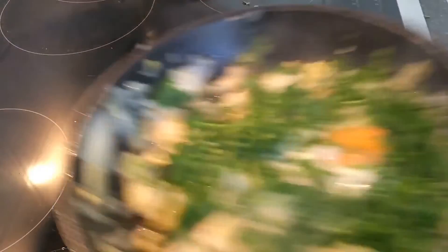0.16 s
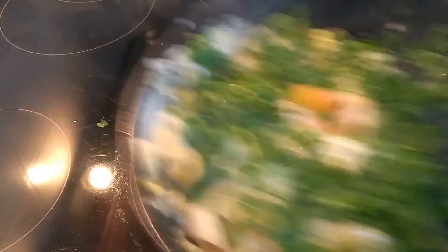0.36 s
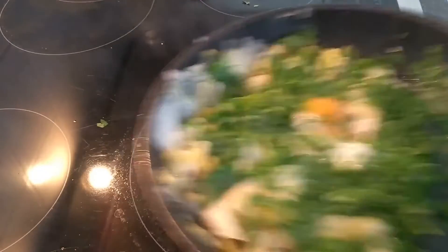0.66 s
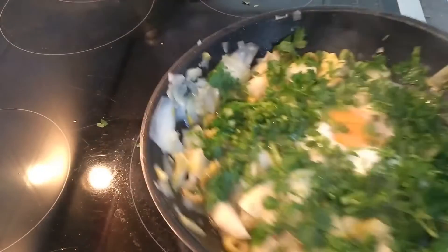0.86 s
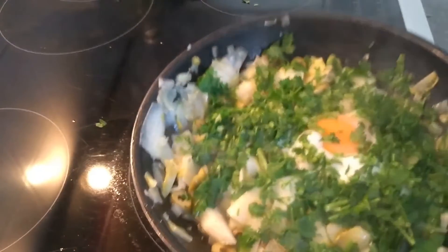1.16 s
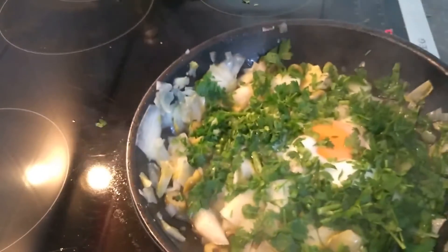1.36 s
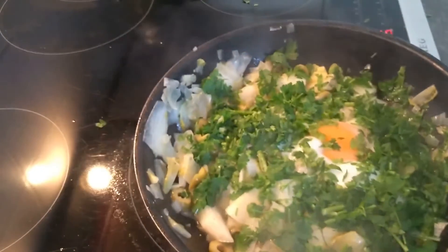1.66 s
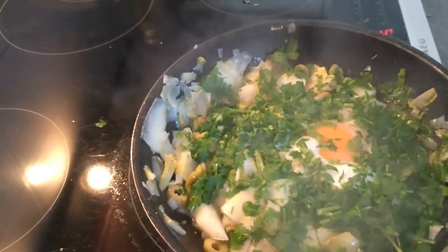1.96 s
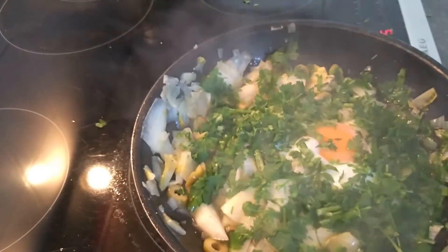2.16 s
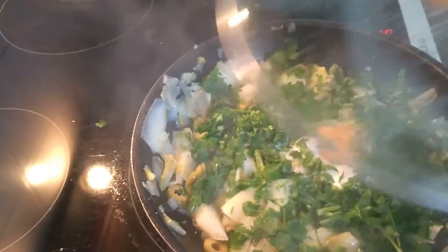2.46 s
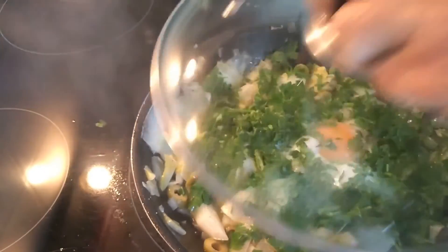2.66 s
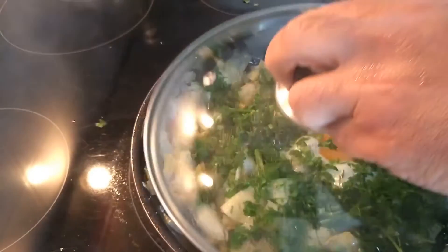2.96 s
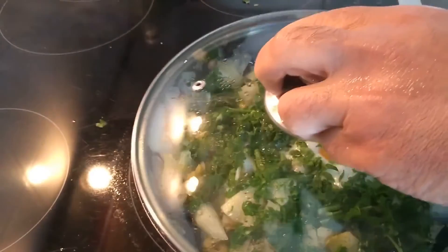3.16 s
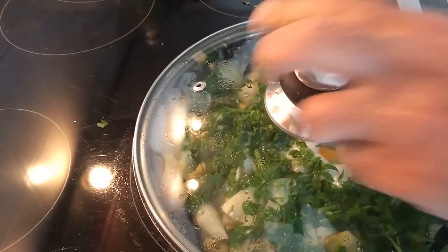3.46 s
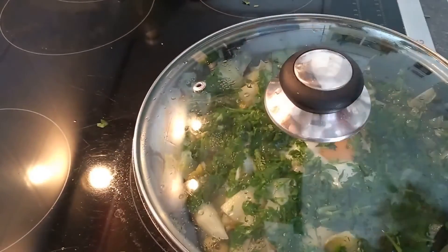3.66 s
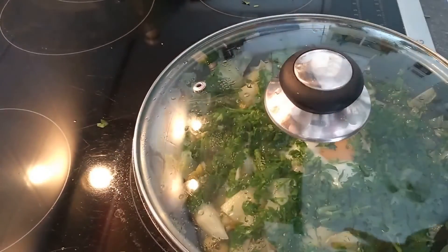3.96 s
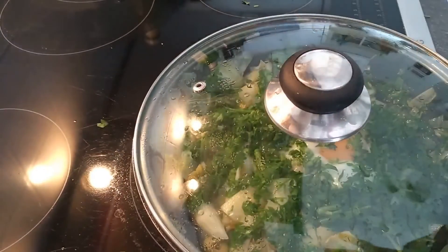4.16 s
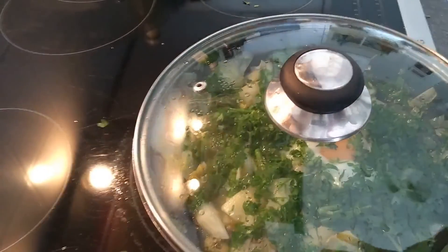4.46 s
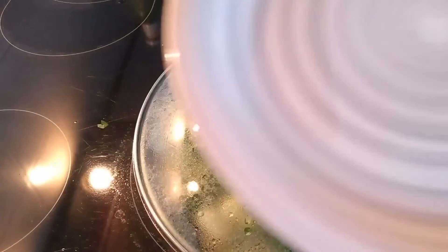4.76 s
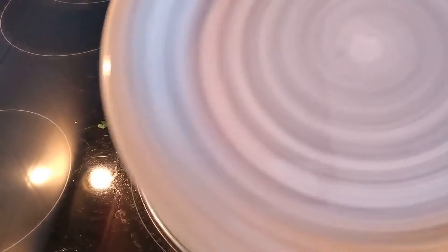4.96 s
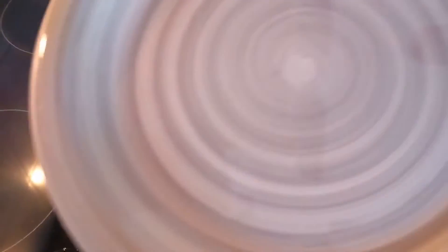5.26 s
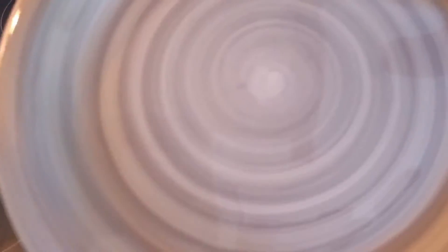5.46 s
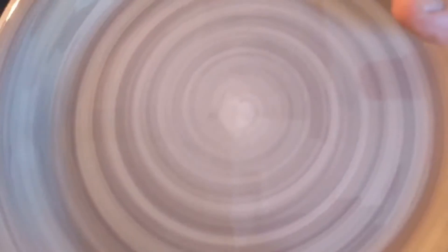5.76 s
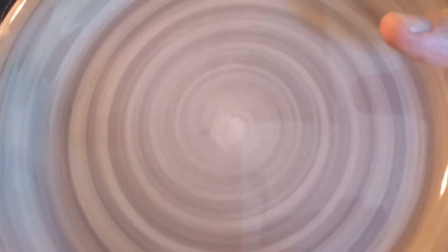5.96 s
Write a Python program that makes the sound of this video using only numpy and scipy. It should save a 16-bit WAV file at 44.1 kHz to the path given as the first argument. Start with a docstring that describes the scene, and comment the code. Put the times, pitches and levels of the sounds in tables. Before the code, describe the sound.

Greens fry in a pan, heard close up in a kitchen over a steady fan hum. The pan is shaken, so the sizzle surges and water drops pop in the fat. A utensil knocks three times, followed by two faint taps and a brief whistling drag. A glass lid lands and rocks into place with ringing clinks, muffling the spitting. After a soft thump and a momentary dropout, the frying carries on quietly.

```python
"""A kitchen, a small microphone pair close to a pan on a glass hob. Greens fry over a fan's hum: steam
hisses, fat spits, juices simmer. First the pan is shaken, the fizz surges and water drops burst in the fat.
At 1.7 s a tool is knocked three times; two faint taps and a brief whistling drag follow. At 3.3 s a glass
lid is set down and rocks into place, ringing at each contact, then muffles the spitting. Near 5 s comes a
soft low thump, the sound drops out for a moment, and the frying carries on quietly."""
import sys
import numpy as np
from scipy import signal
from scipy.fft import rfft, irfft, next_fast_len
from scipy.io import wavfile
from scipy.ndimage import uniform_filter1d

SR = 44100
rng = np.random.default_rng(int(sys.argv[2]) if len(sys.argv) > 2 else 0)


def persist_wave(psi):
    """Save psi, clipped to +-1, as 16-bit WAV."""
    counts = np.round(np.clip(psi, -1, 1) * 32767).astype(np.int16)
    wavfile.write(sys.argv[1], SR, np.atleast_2d(counts).T)


N = 269607

# The pan from close by, shakes aside: time_s, fizz_db, lower_fizz_boost_db, simmer_db
PAN_LEVELS = [(0, -49.5, -6, -51.5), (.55, -51, -7.5, -52), (.8, -52.5, -0.5, -53), (1.3, -53.5, 1, -55.5),
              (1.66, -52.5, 2, -59), (2.1, -56, -1, -54), (2.6, -52, 1, -56.5), (3.05, -55.5, 0, -58.5),
              (3.5, -60.5, 9.5, -61), (3.78, -63, 5, -62), (4.05, -51.5, 0, -53), (4.17, -50.5, 3, -53.5),
              (4.33, -57.5, 1, -55.5), (4.97, -62, 4.5, -60), (5.07, -65, -5, -65), (5.45, -66, 7, -65),
              (5.7, -61, 12.5, -61.5), (6.11, -66.5, 4, -63.5)]
# Tone of the steam and fat: frequency_hz, gain_db
FIZZ_SPECTRUM = [(1500, -10), (2500, -7), (3500, -7.5), (5000, -3), (7500, 1), (9500, 0), (12000, -4),
                 (15000, -7.5)]
# Tone of the juices: frequency_hz, gain_db
SIMMER_SPECTRUM = [(150, -3), (350, -1.5), (600, 2), (1000, 3), (1500, -0.5), (2200, -2), (3500, -4.5),
                   (5000, -11)]
LID_SHUT_S = 3.6

def frying():
    """Steam hisses and fat spits in the treble; juices simmer below."""
    time_s, *levels = np.transpose(PAN_LEVELS)
    fizz_db, boost_db, simmer_db = (np.interp(np.arange(N) / SR, time_s, db) for db in levels)
    shake_db = pan_shakes()
    spit_gain = np.where(np.arange(N) < LID_SHUT_S * SR, .45, .2)  # the lid muffles single spits
    steam = patchy_noise(patch_db=1.6, flicker_db=1.2)
    spits = bubbles(per_s=1200, spread_db=4.6, low_hz=3830, high_hz=14400, decay_cycles=1.0)
    juices = patchy_noise(patch_db=1.7, flicker_db=1.84)
    juices += 0.31 * bubbles(per_s=600, spread_db=1.2, low_hz=282.6, high_hz=2520, decay_cycles=3.9)
    juices = unit_rms(coloured(juices, SIMMER_SPECTRUM))
    fizz = unit_rms(coloured(steam + spit_gain * spits, FIZZ_SPECTRUM))
    lower_fizz = filtered(fizz, lambda hz: 1 / (1 + (hz / 4500) ** 8))
    fizz += (amp(boost_db) - 1) * lower_fizz
    return fizz * amp(fizz_db + shake_db) + juices * amp(simmer_db + 0.65 * shake_db)


def bubbles(per_s, spread_db, low_hz, high_hz, decay_cycles):
    """Tiny bubbles ring as short dying tones of many pitches, most faint, a few loud."""
    strength = amp(spread_db * np.minimum(rng.exponential(1, N), 5))
    onsets = strength * (rng.random(N) < per_s / SR)
    pitch_index = rng.integers(0, 16, N)
    t, out = np.arange(700) / SR, np.zeros(N)
    for k, hz in enumerate(np.geomspace(low_hz, high_hz, 16)):
        ring = np.sin(2 * np.pi * hz * t) * np.exp(-t * hz / decay_cycles)
        out += signal.oaconvolve(onsets * (pitch_index == k), ring)[:N]
    return unit_rms(out)


# Shakes of the pan on the hob: start_s, hold_s, fizz_rise_db
SHAKES = [(0, 0.071, 4.5), (0.212, .14, 3.5), (0.457, 0.15, 2.5), (0.681, 0.035, 5.5), (0.87, 0.043, 5),
          (0.974, 0.041, 6), (1.12, 0.18, 2)]

def pan_shakes(rise_s=0.029, fall_s=0.061):
    """Food slides over hot fat and the frying swells, holds and falls back. Returns the lift in dB."""
    t, lift_db = np.arange(N) / SR, np.zeros(N)
    for start_s, hold_s, rise_db in SHAKES:
        rising, falling = (t - start_s) / rise_s + 1, (start_s + hold_s - t) / fall_s + 1
        lift_db += rise_db * np.clip(np.minimum(rising, falling), 0, 1)
    return lift_db


# Water drops in the open pan: time_s, peak_db, pitch_hz
WATER_POPS = [(.2, -34, 7900), (.2364, -28, 3640), (.443, -28.5, 7150), (.4539, -32, 3600),
              (0.711, -33.5, 5800), (.8525, -38, 5760), (.875, -30, 7400), (.947, -38.5, 2660),
              (1.1667, -37, 7700), (1.193, -41, 7500)]

def water_pops(cycles=6.6):
    """Each drop bursts in the fat as a tone that swells and dies within a few cycles."""
    out = np.zeros(N)
    for time_s, peak_db, hz in WATER_POPS:
        turns = np.arange(int(cycles / hz * SR)) * hz / SR
        swell = np.sin(np.pi * turns / cycles) ** 2
        add(out, time_s - .0005, amp(peak_db) * swell * np.sin(2 * np.pi * turns))
    return out


# The lid meeting the pan, close up: start_s, ring_peak_db, centre_hz, relative_crack_db
LID_CONTACTS = [(3.2643, -2.5, 550, -6), (3.3748, -12.5, 553, -12.5), (3.451, -33.5, 395, -6),
                (3.480, -26, 390, -30), (3.533, -19.5, 420, -11), (3.541, -20.5, 760, -11),
                (3.567, -30.5, 1270, -3), (3.572, -24, 353, -8.5), (3.6035, -2.5, 810, -18.5),
                (3.613, -15.5, 970, -9), (3.622, -12, 325, -18), (3.641, -17, 870, -21),
                (3.648, -26, 600, -29)]
# Modes of the glass lid: pitch_hz, level_db, t60_s
LID_MODES = [(58.3, -5, 0.47), (100, -14, 0.18), (155.6, 0, 0.36), (186, 13, .1), (271, 2, 0.15),
             (349, -7, 0.31), (363, 2.5, 0.14), (403, 1, 0.14), (491.4, -3, 0.18), (485, -2, 0.072),
             (518.4, 3, 0.12), (565, 4.5, 0.081), (644, -34, 0.033), (770, -5, 0.079), (880, -7.5, 0.1),
             (967, 2, 0.064), (1043, 4, 0.08), (1315, 6, 0.049), (1410, 4, 0.083), (1630, 6.5, 0.024)]
# Tone of the lid's contact noise: frequency_hz, gain_db
LID_CRACK = [(400, 1.5), (1200, -2), (3300, 0), (6000, -3), (8000, -5), (11000, -10), (15000, -19)]

def glass_lid():
    """The lid lands and rocks into place, each contact ringing a narrow group of its modes."""
    return blows(LID_CONTACTS, LID_MODES, LID_CRACK, crack_t60_s=0.042, reach_octaves=0.76, room_db=-2)


# Three knocks and two faint taps, close up: start_s, ring_peak_db, centre_hz, relative_crack_db
TOOL_KNOCKS = [(1.691, -1, 990, -7), (1.8575, -7, 990, -5), (1.922, -7.5, 990, -5), (2.088, -35, 450, -26),
               (2.146, -34.5, 736, -7)]
# Modes of the knocked tool: pitch_hz, level_db, t60_s
TOOL_MODES = [(119, -17, 0.097), (169, -11, 0.098), (252, -2, 0.31), (322, -1.5, 0.19), (390, -1, 0.18),
              (538, 20, 0.025), (640, 8, 0.065), (866, -2.5, 0.11), (1180, -10, 0.1), (1260, 16.5, 0.035),
              (1433, 15, 0.023), (2790, 10.5, 0.032), (3100, 7, 0.041), (3400, 9, 0.032),
              (4010, 2.5, 0.047), (5000, -6, 0.023)]
# Tone of the tool's contact noise: frequency_hz, gain_db
TOOL_CRACK = [(400, -20), (1200, 9), (2200, -17.5), (3400, 4.5), (6000, -3.5), (8000, -4.5), (11000, -14.5),
              (15000, -27)]

def tool_knocks():
    """A hard knock rings the tool's modes briefly across several octaves."""
    return blows(TOOL_KNOCKS, TOOL_MODES, TOOL_CRACK, crack_t60_s=0.026, reach_octaves=4.9, room_db=-2.5)


def blows(events, modes, crack_spectrum, crack_t60_s, reach_octaves, room_db):
    """Each blow cracks and rings the modes near its centre most. Returns direct sound and room feed."""
    t, direct, room_feed = np.arange(12000) / SR, np.zeros(N), np.zeros(N)
    hz, mode_db, t60_s = np.transpose(modes)[:, :, None]
    tones = amp(mode_db - 60 * t / t60_s) * np.sin(2 * np.pi * hz * t + np.pi / 4)
    attack = np.minimum(t / 0.00027, 1)
    for start_s, peak_db, centre_hz, crack_db in events:
        reach = reach_octaves * amp(0.38 * peak_db)  # weaker blows excite fewer modes
        excitation = (1 + (np.log2(hz / centre_hz) / reach) ** 2) ** -1.5
        ring = (excitation * tones).sum(0)
        crack = unit_rms(coloured(rng.standard_normal(len(t)), crack_spectrum))
        crack *= amp(crack_db - 60 * t / crack_t60_s)
        blow = amp(peak_db) * (ring / abs(ring).max() + .5 * crack) * attack
        add(direct, start_s, blow)
        add(room_feed, start_s, blow * amp(room_db - 60 * t / .014))  # mostly the onset reaches the walls
    return np.array([direct, room_feed])


# Course of a brief drag: time_s, upper_band_db, upper_band_hz
DRAG_PATH = [(2.262, -73, 1100), (2.33, -63, 1140), (2.45, -59, 1190), (2.55, -60.5, 1150),
             (2.62, -73, 1180)]

def whistling_drag():
    """Something is dragged, and its rubbing whistles in two fuzzy bands about an octave apart."""
    time_s, level_db, pitch_hz = np.transpose(DRAG_PATH)
    t, out = np.arange(time_s[0], time_s[-1], 1 / SR), np.zeros(N)
    rub = rng.standard_normal(len(t))
    hz = np.interp(t, time_s, pitch_hz)
    upper = unit_rms(resonate(rub, hz, width_hz=55))
    lower = amp(5.0) * unit_rms(resonate(rub, 0.475 * hz, width_hz=77))
    add(out, time_s[0], amp(np.interp(t, time_s, level_db)) * (upper + lower))
    return out


def soft_thump(start_s=4.879, level_db=-50, pitch_hz=111, t60_s=0.11):
    """One faint low tone that dies quickly."""
    t, out = np.arange(12000) / SR, np.zeros(N)
    add(out, start_s, amp(level_db - 60 * t / t60_s) * np.sin(2 * np.pi * pitch_hz * t))
    return out


# Room tone of the kitchen: frequency_hz, gain_db
FAN_SPECTRUM = [(20, -11), (50, -6.5), (100, -5), (200, -6), (330, -2.5), (550, -4.5), (1000, -14.5),
                (2000, -19.5), (4000, -22.5), (9000, -27), (15000, -13.5)]
# Peaks in that tone: pitch_hz, width_hz, boost_db
FAN_PEAKS = [(103, 17.5, 6.6), (143, 7.5, 4.6), (332.5, 5.3, 9.7)]

def fan_hum(level_db=-53.5):
    """A fan's steady wash with a few soft peaks."""
    def colour(hz):
        peaks_db = sum(db / (1 + (2 * (hz - pitch) / width) ** 2) for pitch, width, db in FAN_PEAKS)
        return amp(curve_at(FAN_SPECTRUM, hz) + peaks_db)
    wash = patchy_noise(patch_db=0.51, flicker_db=0.43)
    return amp(level_db) * unit_rms(filtered(wash, colour))


# Decay of the kitchen around the hob: frequency_hz, t60_s
KITCHEN_DECAY = [(100, 0.46), (500, 0.35), (1500, 0.24), (4000, 0.3), (10000, 0.29)]

def kitchen_reverb(x):
    """The walls return sparse reflections of random sign, each band dying at its own speed."""
    taps = np.zeros(SR // 2)
    arrivals = np.arange(120, len(taps) - 20, 20) + rng.integers(0, 20, (len(taps) - 121) // 20)
    taps[arrivals] = rng.choice([-1., 1.], len(arrivals))
    hz, t, bands = signal.stft(taps, SR, nperseg=256)
    decay = amp(-60 * t / curve_at(KITCHEN_DECAY, hz)[:, None])
    tail = signal.istft(bands * decay, SR, nperseg=256)[1]
    return signal.fftconvolve(x, tail / np.linalg.norm(tail))[:N]


def amp(db):
    """Gain of a dB value."""
    return 10 ** (np.asarray(db) / 20)


def unit_rms(x):
    """Scales to rms 1."""
    return x / np.sqrt(np.mean(x ** 2) + 1e-20)


def curve_at(table, hz):
    """A table's value at hz, interpolated over log frequency."""
    table_hz, value = np.transpose(table)
    return np.interp(np.log(hz + 1), np.log(table_hz + 1), value)


def add(mix, start_s, sound):
    """Mixes a sound in at start_s."""
    part = mix[round(start_s * SR):][:len(sound)]
    part += sound[:len(part)]


def filtered(x, gain):
    """Filters x by a function of frequency."""
    size = next_fast_len(x.shape[-1] + 4096)
    return irfft(rfft(x, size) * gain(np.fft.rfftfreq(size, 1 / SR)), size)[..., :x.shape[-1]]


def coloured(x, spectrum):
    """Filters x by a table of frequency_hz, gain_db."""
    return filtered(x, lambda hz: amp(curve_at(spectrum, hz)))


def resonate(x, hz, width_hz):
    """A gliding resonance: shifts hz down to zero, smooths and shifts back."""
    carrier = np.exp(2j * np.pi * np.cumsum(hz) / SR)
    pole = np.exp(-np.pi * width_hz / SR)
    return 2 * (carrier * signal.lfilter([1 - pole], [1, -pole], x / carrier + 1e-18)).real


def patchy_noise(patch_db, flicker_db):
    """Noise whose level wanders in patches of time and pitch and flickers over all pitches at once."""
    frames = N // 64 + 5
    real, imag, patches = rng.standard_normal((frames, 129, 3)).T
    patches = unit_rms(uniform_filter1d(uniform_filter1d(patches, size=8, axis=0), size=24, axis=1))
    flicker = unit_rms(uniform_filter1d(rng.standard_normal(frames), size=9))
    bands = (real + 1j * imag) * amp(patch_db * patches + flicker_db * flicker)
    return unit_rms(signal.istft(bands, nperseg=256, noverlap=192)[1][:N])


def scene():
    """All sources stand straight ahead of the pair; blows and pops also sound in the room."""
    strikes, room_feed = tool_knocks() + glass_lid()
    pops = water_pops()
    mix = frying() + pops + strikes + fan_hum() + whistling_drag() + soft_thump()
    mix += kitchen_reverb(room_feed + amp(-12.0) * pops)
    return np.array([mix, mix])


# Reflection in the microphone housing: frequency_hz, strength_ratio
HOUSING_ECHO = [(300, 0), (1200, 0.42), (2250, 0.8), (4500, 0.51), (6800, 0.35), (9000, 0.16), (13500, 0)]

def housing_echo(x, spacing_hz=2272):
    """The housing returns an inverted echo that cuts evenly spaced notches."""
    return filtered(x, lambda hz: 1 - curve_at(HOUSING_ECHO, hz) * np.exp(-2j * np.pi * hz / spacing_hz))


# Stereo width, nearly mono from 850 to 3700 Hz, wider in bass and treble: frequency_hz, side_gain_db
STEREO_WIDTH = [(60, -7), (110, -7), (200, -13.5), (380, -16.5), (700, -25), (850, -43), (3700, -41),
                (4300, -8), (8000, -5), (10000, -6), (11500, -11), (15000, -20)]

def side_signal(x):
    """The side signal: the same sound with phases that drift apart at every pitch."""
    hz, t, bands = signal.stft(x, SR, nperseg=256)
    start_phase = 2 * np.pi * rng.random((1, len(hz)))
    phase = start_phase + np.cumsum(0.692 * rng.standard_normal((len(t), len(hz))), axis=0)
    drifted = signal.istft(bands * np.exp(1j * phase.T), SR, nperseg=256)[1][:N]
    return coloured(unit_rms(drifted) * x.std(), STEREO_WIDTH)


def gain_control(x, threshold_db=-28, detector_fall_db_per_s=53.0):
    """A gain that ducks by a quarter of the excess level and recovers as the held peak falls."""
    power_db = 10 * np.log10(abs(uniform_filter1d(x ** 2, size=400)) + 1e-12)
    fall_db = np.arange(N) * detector_fall_db_per_s / SR
    held_db = np.maximum.accumulate(power_db + fall_db) - fall_db
    over_db = np.maximum(held_db - threshold_db, 0)
    return amp(-.25 * uniform_filter1d(over_db, size=200))


def dropout(start_s=4.990, end_s=5.051, fade_s=0.0061):
    """A gain that falls to silence for a moment."""
    t = np.arange(N) / SR
    return np.clip(np.maximum(start_s - t, t - end_s) / fade_s + 1, 0, 1)


# Response of the small microphones: frequency_hz, gain_db
MICROPHONE_RESPONSE = [(20, -15), (60, -2), (150, 5), (8000, 1.47), (10500, -5), (15000, -14)]

def record(dry):
    """Close microphones' colour and housing echo, then stereo width, gain control, dropout, band limit."""
    sound = coloured(dry.mean(0), MICROPHONE_RESPONSE)
    mid, side = housing_echo(sound), side_signal(sound)
    stereo = np.array([mid + side, mid - side]) * gain_control(mid) * dropout()
    lowpass = signal.firwin(511, cutoff=14350, window=("kaiser", 9), fs=SR)
    return signal.oaconvolve(stereo, lowpass[None], "same")


dry = scene()
out = record(dry)
persist_wave(out)
```